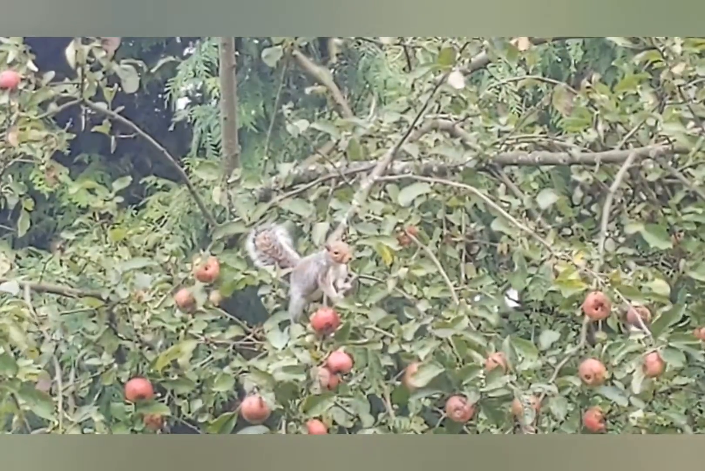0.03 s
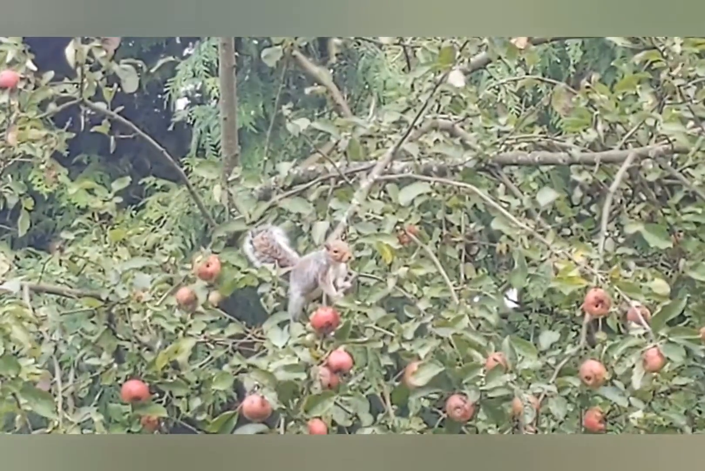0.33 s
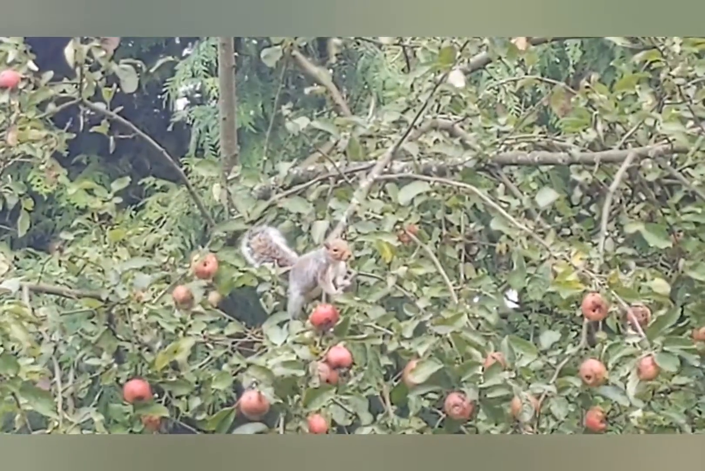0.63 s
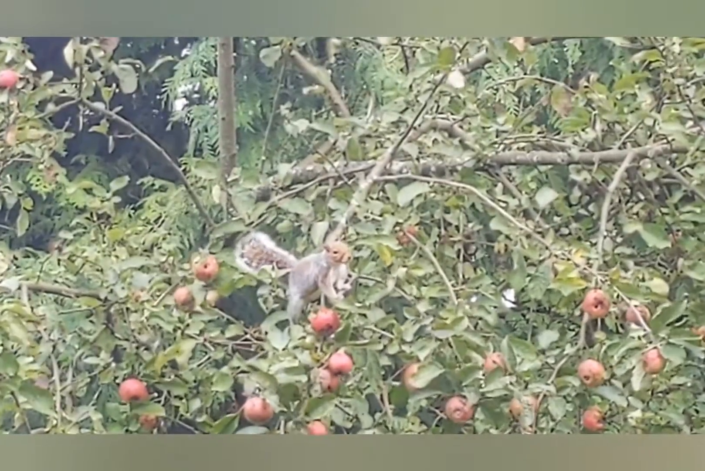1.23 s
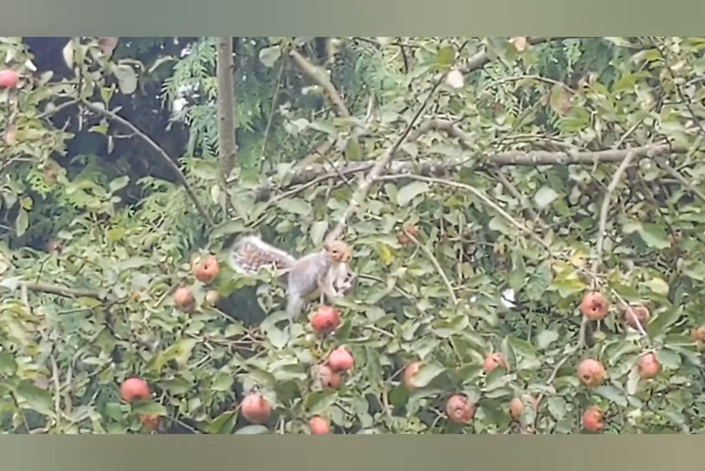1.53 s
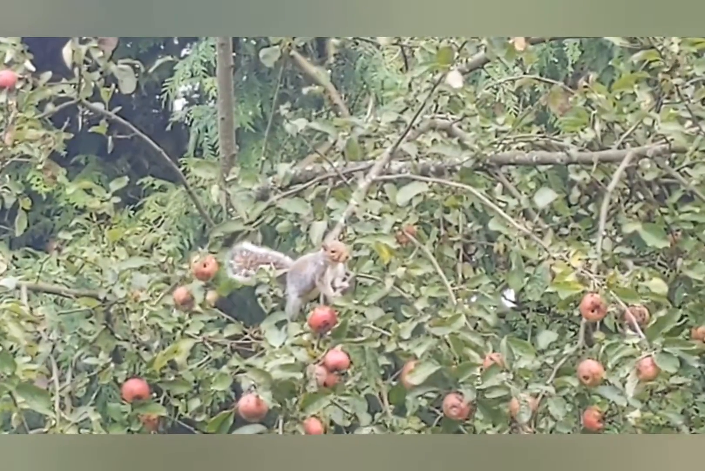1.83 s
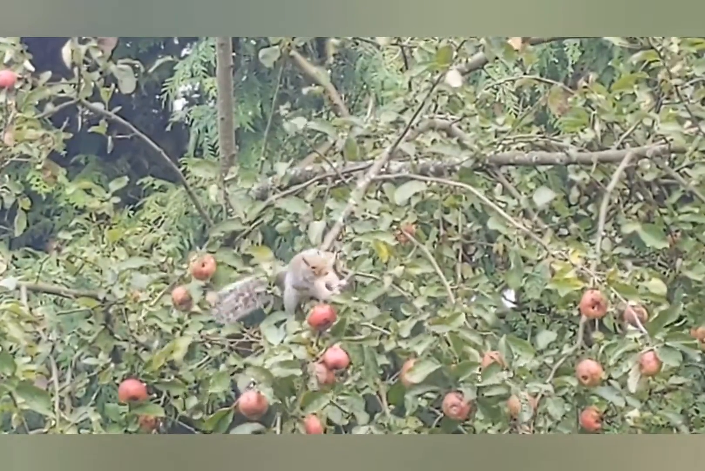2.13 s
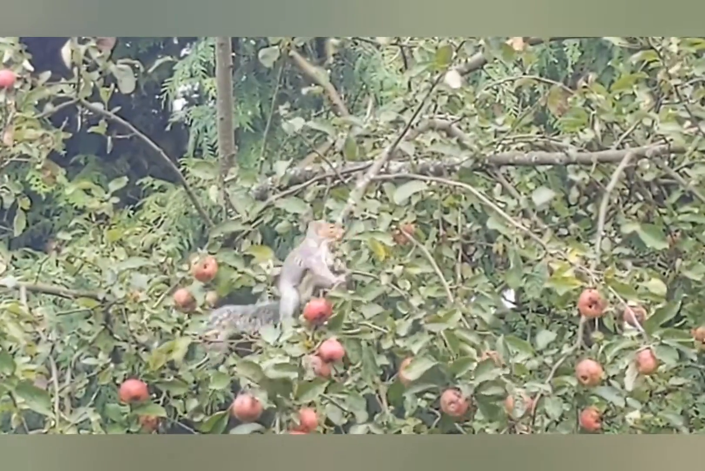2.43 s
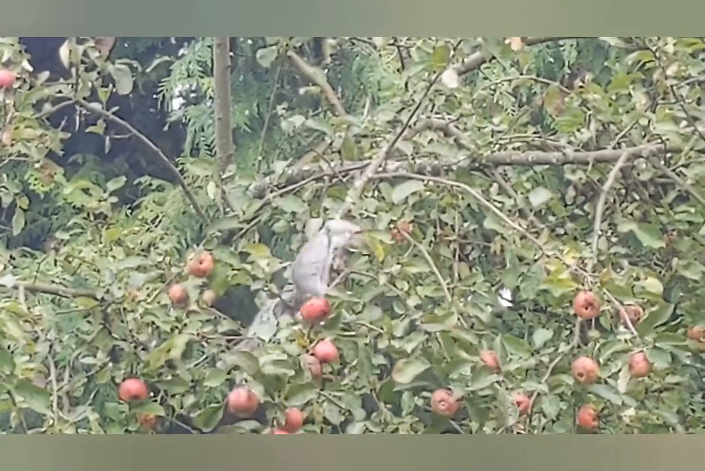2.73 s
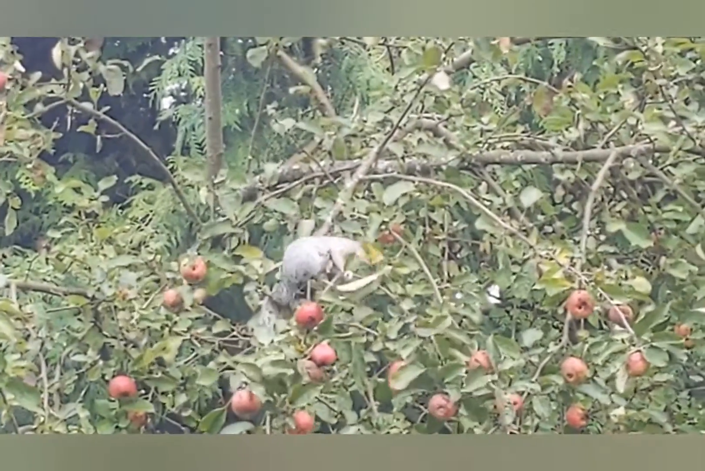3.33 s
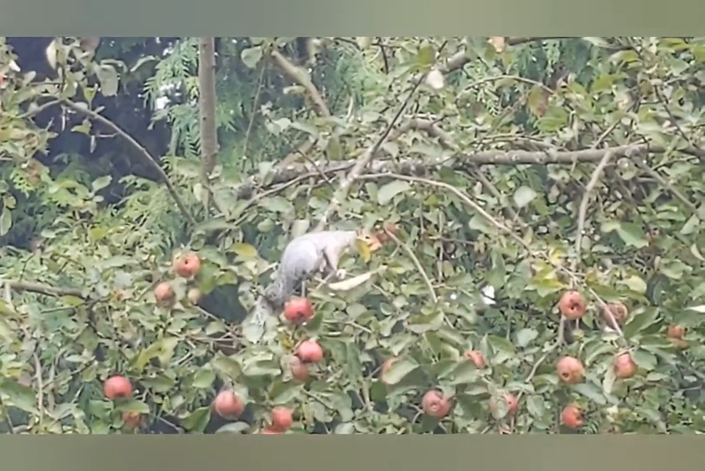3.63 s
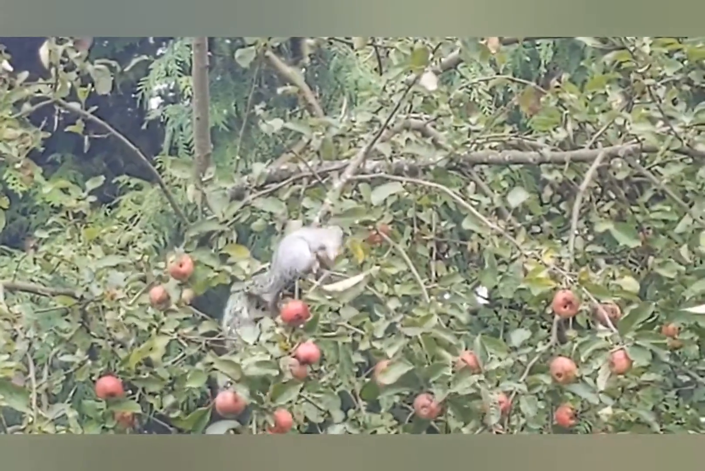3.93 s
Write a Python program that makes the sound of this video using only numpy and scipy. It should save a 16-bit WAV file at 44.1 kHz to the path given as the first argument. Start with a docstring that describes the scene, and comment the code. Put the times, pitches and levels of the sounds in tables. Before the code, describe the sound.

Leaves rustle softly and small twigs snap as a squirrel makes one short scramble in a tree, late on. Faint birds chirp far off over a quiet outdoor hush, while a rising breeze rumbles on the microphone.

```python
"""Squirrel in an apple tree

A squirrel shifts about: leaves brush in showers of crinkles, and one short scramble snaps twigs.
Small birds call far off in short glides over a quiet outdoor hush. A light breeze stirs distant
foliage and, as it rises, buffets the two microphone ports one by one."""
import sys
import numpy as np
from scipy import signal
from scipy.fft import rfft, irfft, next_fast_len
from scipy.io import wavfile
from scipy.ndimage import uniform_filter1d, map_coordinates

SR = 44100
rng = np.random.default_rng(int(sys.argv[2]) if len(sys.argv) > 2 else 0)


def wav_record(signal):
    """Record a signal, one row per channel, as 16-bit PCM in the file named by sys.argv[1]."""
    frames = np.transpose(np.atleast_2d(signal))
    bounded = np.clip(frames, -1, 1)
    # unit amplitude maps onto the largest positive 16-bit level
    quanta = np.round(bounded * 32767).astype(np.int16)
    wavfile.write(sys.argv[1], SR, quanta)


N = 176400


def amp(db):
    """Decibels to gain."""
    return 10 ** (np.asarray(db) / 20)


def unit(x):
    """Scale to rms 1."""
    return x / np.sqrt(np.mean(x ** 2) + 1e-30)


def along(points, hz):
    """Interpolate (f/Hz, value) points on a log axis."""
    f, v = np.transpose(points)
    return np.interp(np.log(hz + 1), np.log(f + 1), v)


def curve(points):
    """One value per sample from (t/s, value) points."""
    return np.interp(np.arange(N) / SR, *np.transpose(points))


def wobble(rate_hz):
    """Smooth random curve, rate_hz knots a second."""
    knots = rng.standard_normal(int(N * rate_hz / SR) + 4)
    return map_coordinates(knots, [np.arange(N) * rate_hz / SR])


def filtered(x, response):
    """Apply a gain given as a function of f/Hz."""
    size = next_fast_len(N + SR // 2)
    return irfft(rfft(x, size) * response(np.fft.rfftfreq(size, 1 / SR)), size)[..., :N]


def coloured(x, colour, tilt_db_oct, peak_hz, peak_db=4, half_width_oct=0.66):
    """Unit-energy minimum-phase filter: colour, tilt and one broad resonance."""
    size = 2048
    hz = np.maximum(np.fft.rfftfreq(size, 1 / SR), colour[0][0])
    resonance_db = peak_db / (1 + (np.log2(hz / peak_hz) / half_width_oct) ** 2)
    log_gain = np.log(amp(along(colour, hz) + tilt_db_oct * np.log2(hz) + resonance_db))
    causal_fold = np.r_[1, np.full(size // 2 - 1, 2), np.zeros(size // 2)]
    kernel = irfft(np.exp(rfft(irfft(log_gain) * causal_fold)))
    return signal.fftconvolve(x, kernel / np.linalg.norm(kernel))


def add(track, start_s, x):
    """Mix x into the track."""
    i = max(0, round(start_s * SR))
    track[i:i + len(x)] += x[:len(track[i:i + len(x)])]


def placed(x, balance):
    """Pan each frequency by (f/Hz, left minus right/dB) points."""
    return filtered(x, lambda hz: amp(np.outer([.5, -.5], along(balance, hz))))


def scattered(x, t60_s):
    """Echoes off surrounding foliage, different at each port."""
    t = np.arange(SR // 2) / SR
    tail = rng.standard_normal((2, len(t))) * amp(-60 * t / t60_s)
    return signal.fftconvolve(x[None], tail / np.linalg.norm(tail[0]), axes=1)[:, :N]


def twigs(click_db=4, tear_t60_s=.0075, ring_db=-10, ring_t60_s=.016):
    """Each snap: a sharp click, a burst of tearing fibres, a short woody ring."""
    # twig and leaf-stalk snaps: t/s, level/dB, tilt/(dB/oct), resonance/Hz
    snaps = [(0.83, -62, 2, 14000), (2.763, -55, -5, 2350), (2.8937, -50, -5, 5460),
             (2.9265, -50.5, 0, 2500), (2.9297, -44, -0.5, 4570), (2.9515, -49, -5, 2650),
             (2.9808, -42.5, -1.5, 2480), (2.9835, -53, -2, 2450), (3.0275, -57, -5, 5700),
             (3.0365, -52, -5.5, 5770)]
    # snap spectrum: f/Hz, level/dB
    colour = [(400, -31), (1200, -20), (1800, -0.5), (2480, 4), (3400, -11.5), (4300, -9.5), (5800, 5),
              (7300, -8), (9500, -14), (15000, -10)]
    out, t = np.zeros(N), np.arange(SR // 16) / SR
    for start_s, db, tilt_db_oct, hz in snaps:
        click = amp(click_db) * (t == 0)
        tear = amp(-60 * t / tear_t60_s) * rng.standard_normal(len(t))
        ring = amp(ring_db - 60 * t / ring_t60_s) * np.sin(2 * np.pi * hz * t)
        add(out, start_s, amp(db) * coloured(click + tear, colour, tilt_db_oct, hz))
        add(out, start_s, amp(db) * ring)
    return out


def leaves(attack_s=0.0048, crinkles_per_s=3200, spread_db=2.5):
    """Each brush: a dense shower of tiny crinkles that rises fast and fades."""
    # leaf brushes: t/s, level/dB, T60/s, tilt/(dB/oct), resonance/Hz
    brushes = [(.829, -68.5, .06, 2, 14000), (1.138, -71.5, 0.2, -1.5, 10000),
               (2.462, -67.5, 0.22, 0, 10400), (2.76, -65.5, 0.08, -2, 2300), (2.889, -60, 0.4, -1.5, 5660),
               (2.921, -61.5, 0.35, -2, 4530), (2.981, -59.5, 0.3, -0.5, 5700),
               (3.024, -67.5, 0.39, 2, 5540), (3.14, -71, .15, -2, 13000), (3.25, -66, .1, -3, 5830),
               (3.81, -75, 0.44, 9, 13000)]
    # crinkle spectrum: f/Hz, level/dB
    colour = [(400, -17), (1300, -3), (2400, -1.5), (3400, -6.5), (5500, -8), (7500, -9.5), (10000, -8.5),
              (15000, -13.5)]
    out, t = np.zeros(N), np.arange(SR // 3) / SR
    for start_s, db, t60_s, tilt_db_oct, hz in brushes:
        hits = rng.random(len(t)) < crinkles_per_s / SR
        signs = np.sign(rng.standard_normal(len(t)))
        sizes = amp(spread_db * np.clip(rng.standard_normal(len(t)), -2, 2))
        envelope = np.minimum(t / attack_s, 1) * amp(-60 * np.maximum(t - attack_s, 0) / t60_s)
        crinkles = unit(hits * signs * sizes) * envelope
        add(out, start_s, amp(db) * coloured(crinkles, colour, tilt_db_oct, hz))
    return out


def squirrel(echo_db=-3):
    """Snaps and brushes with their echoes in the tree."""
    # rustle balance: f/Hz, left minus right/dB
    balance = [(700, 7), (2400, 5.5), (4400, 11), (8100, 0.5), (11000, -7), (15000, -14)]
    rustle = twigs() + leaves()
    return placed(rustle + amp(echo_db) * scattered(rustle, t60_s=0.1), balance)


def birds(direct_db=-4.5, echo_db=-2, pan_db=1):
    """Short glides, pure or raspy, blurred by distance."""
    # high chips: t/s, length/s, start f/Hz, end f/Hz, level/dB, rasp/fraction of pitch
    chips = [(0.08, .026, 8300, 8100, -71, .01), (0.088, 0.016, 7200, 5000, -63, 0.1),
             (.27, .045, 6800, 6750, -75, .025), (.53, .035, 6800, 6950, -74, .025),
             (.765, .045, 6960, 6450, -72, 0.028), (0.832, .032, 8800, 7800, -71, .04),
             (2.32, .024, 7820, 7980, -67, .015), (2.336, 0.0284, 6600, 5570, -65, .11),
             (3.041, 0.05, 8450, 7680, -61.5, .035), (3.729, 0.052, 9100, 8400, -74, .04),
             (3.787, 0.086, 7600, 7000, -68.5, 0.078)]
    # lower whistles: same columns
    whistles = [(0, 0.018, 2600, 2560, -62, 0.054), (.088, .028, 2790, 2960, -70, .025),
                (.65, .05, 3500, 3820, -75, 0.081), (2.102, .09, 2583, 2276, -63.5, 0.077),
                (2.586, 0.05, 2550, 2360, -64.5, 0.048), (3.15, 0.043, 2450, 2550, -71, 0.036),
                (3.187, 0.037, 3004, 3010, -63, .02), (3.255, 0.069, 3000, 3020, -69.5, 0.034),
                (3.651, 0.051, 2586, 2647, -62.5, .025), (3.775, .11, 2405, 2350, -66, .03),
                (3.876, 0.05, 3200, 4410, -67.5, 0.13), (3.925, 0.033, 2434, 2420, -66, .015),
                (3.968, .035, 4260, 3980, -66, .015), (3.97, 0.034, 2406, 2365, -58.5, .015)]
    calls, waver = np.zeros(N), wobble(rate_hz=900)
    for start_s, length_s, start_hz, end_hz, db, rasp in chips + whistles:
        u = np.linspace(0, 1, int(length_s * SR))
        jitter = rasp * np.roll(waver, -int(start_s * SR))[:len(u)]
        hz = (start_hz + (end_hz - start_hz) * u) * (1 + jitter)
        add(calls, start_s, amp(db) * np.sin(np.pi * u) * np.sin(2 * np.pi * np.cumsum(hz) / SR))
    distant = amp(direct_db) * calls + amp(echo_db) * scattered(calls, t60_s=.2)
    return distant * amp([[pan_db], [-pan_db]])


def port_wind(flutter_db=2.2):
    """Wind rumbles on each port separately; a passing eddy pushes, then pulls."""
    # wind on each port: t/s, level/dB
    left = [(0, -47), (.06, -35), (.15, -48), (.4, -69), (1.5, -66.5), (1.68, -57), (1.85, -65),
            (2.52, -57), (2.61, -46.5), (2.8, -55), (2.97, -47), (3.2, -43.5), (3.42, -41.5), (3.55, -42.5),
            (3.68, -46), (3.82, -32), (4, -52)]
    right = [(0, -59), (.1, -50), (.3, -79), (1.53, -61), (1.57, -46), (1.75, -46.5), (1.88, -52),
             (2.02, -48.5), (2.2, -56.5), (2.26, -41.5), (2.4, -44.5), (2.68, -45.5), (2.82, -40),
             (2.94, -51.5), (3.08, -38.5), (3.36, -47.5), (3.55, -48.5), (3.7, -39), (3.8, -40.5),
             (4, -47.5)]
    # buffet spectrum: f/Hz, level/dB
    buffet = [(15, -11.5), (35, 2), (55, -1.5), (85, -4.5), (130, -17), (200, -27), (350, -43.5),
              (800, -79), (2000, -100)]
    # eddy thumps: t/s, level/dB, width/s, port (0 left, 1 right)
    thumps = [(.05, -31, .005, 0), (.085, -29, 0.0053, 0), (1.565, -31, 0.0056, 1),
              (1.689, -38.5, 0.0037, 0), (2.131, -34.5, 0.0061, 1), (2.242, -30.5, 0.0062, 1),
              (2.279, -35, 0.0031, 1), (2.3, -33.5, 0.0032, 1), (2.469, -29, 0.0087, 1),
              (2.623, -33.5, 0.0039, 0), (2.771, -32.5, 0.01, 1), (2.853, -27, 0.0062, 1),
              (3.041, -28.5, 0.0058, 0), (3.072, -32.5, 0.004, 1), (3.152, -21, 0.0033, 0),
              (3.163, -24, 0.0089, 0), (3.258, -29, 0.0042, 1), (3.329, -22, 0.0019, 0),
              (3.346, -22.5, 0.0041, 0), (3.48, -29, 0.0033, 0), (3.628, -29, 0.0026, 1),
              (3.697, -31.5, 0.0037, 1), (3.755, -24, 0.0035, 0), (3.838, -28.5, 0.0028, 0),
              (3.874, -30.5, 0.0032, 0), (3.904, -24, 0.0035, 1)]
    rumble = unit(filtered(rng.standard_normal((2, N)), lambda hz: amp(along(buffet, hz))))
    out = rumble * amp([curve(level) + flutter_db * wobble(rate_hz=26) for level in (left, right)])
    for centre_s, db, width_s, port in thumps:
        u = (np.arange(N) / SR - centre_s) / width_s
        out[port] -= amp(db) * 2 * u / (1 + u * u / 2) ** 3
    return out


def rush(spectrum, patchy_db):
    """Diffuse stereo noise, rms 1, with random gain patches in time and frequency."""
    # likeness of the ports: f/Hz, coherence
    coherence = [(60, 1), (130, 1), (290, 0.85), (640, 0.19), (1250, -0.47), (2500, 0.1), (7000, -0.084)]
    # ambient balance: f/Hz, left minus right/dB
    balance = [(200, 1), (1300, 1.2), (2400, 1), (4400, 4.5), (8100, -0.5), (15000, -2)]

    def mid_side_gains(hz):
        angle = np.arccos(np.clip(along(coherence, hz), -1, 1)) / 2
        return amp(along(spectrum, hz)) * [np.cos(angle), np.sin(angle)]

    bins = signal.stft(rng.standard_normal((2, N)), nperseg=512)[2]
    patches = uniform_filter1d(rng.standard_normal(bins.shape[1:]), size=5, axis=0)
    patches = unit(uniform_filter1d(patches, size=16, axis=1))
    noise = signal.istft(bins * amp(patchy_db * patches), nperseg=512)[1][:, :N]
    mid, side = filtered(noise, mid_side_gains)
    return unit(placed(np.array([mid + side, mid - side]), balance))


def far_swells(sway_db=.4):
    """Far mid-band swells: breeze in foliage and, near 3.67 s, probably a distant bird."""
    # swell envelope: t/s, level/dB
    level = [(0, -71.5), (1.2, -72), (1.55, -67), (1.72, -69.5), (2.05, -64), (2.35, -66.5), (2.55, -66),
             (2.83, -65.5), (3.15, -66), (3.5, -71), (3.67, -65), (3.9, -68), (4, -72)]
    # swell spectrum: f/Hz, level/dB
    spectrum = [(600, -29), (1100, -2), (1450, 3), (1900, 0.5), (2500, -2), (3300, -13.5), (4800, -13),
                (7500, -20.5), (11000, -18.5), (15500, -27)]
    return amp(curve(level) + sway_db * wobble(rate_hz=8)) * rush(spectrum, patchy_db=1.3)


def leaf_hiss():
    """Fine hiss of leaves in the breeze."""
    # hiss envelope: t/s, level/dB
    level = [(0, -78), (1, -76.5), (1.55, -71.5), (2.1, -74), (2.8, -73), (3.4, -75), (4, -75)]
    # hiss spectrum: f/Hz, level/dB
    spectrum = [(1500, -19), (3200, -4.5), (4800, 0), (7500, -9.5), (11000, -3), (15500, -9.5)]
    return amp(curve(level)) * rush(spectrum, patchy_db=0.4)


def hush():
    """Quiet, near-steady outdoor noise, strongest in the bass."""
    # hush envelope: t/s, level/dB
    level = [(0, -59), (1.4, -59.5), (2.8, -60), (3.3, -61.5), (4, -60)]
    # hush spectrum: f/Hz, level/dB
    spectrum = [(15, -21.5), (25, 8.5), (96, -2), (178, -7.5), (198, -4.5), (233, -6), (313, -9),
                (469, -11), (848, -11), (1380, -19.5), (1660, -23), (1800, -19.5), (2010, -21),
                (3170, -26.5), (4150, -28), (15500, -36)]
    return amp(curve(level)) * rush(spectrum, patchy_db=0.93)


def scene():
    """The rustle in the tree, with birds, hush and wind around it."""
    return squirrel() + birds() + hush() + far_swells() + leaf_hiss() + port_wind()


def record(dry, cutoff_hz=15850):
    """Brick-wall low-pass."""
    return filtered(dry, lambda hz: hz < cutoff_hz)


dry = scene()
out = record(dry)
wav_record(out)
```